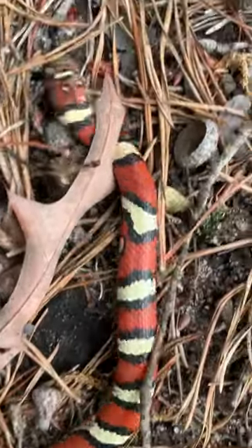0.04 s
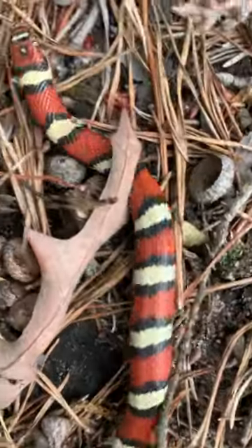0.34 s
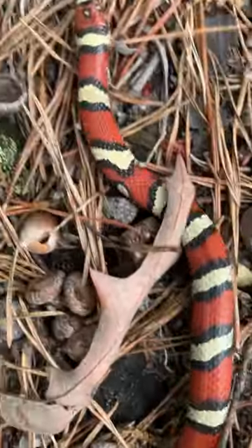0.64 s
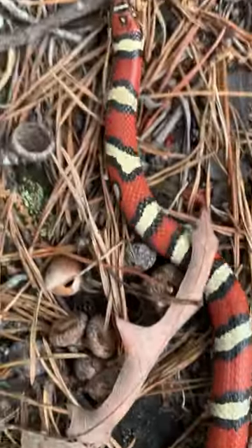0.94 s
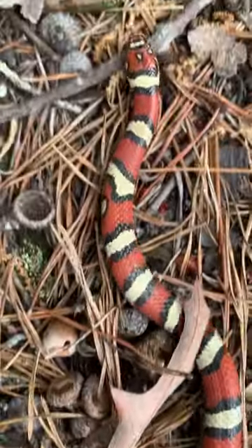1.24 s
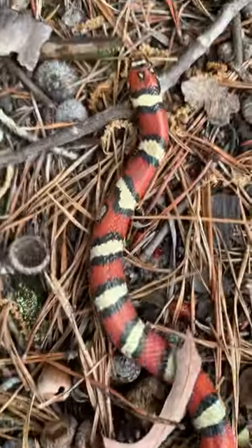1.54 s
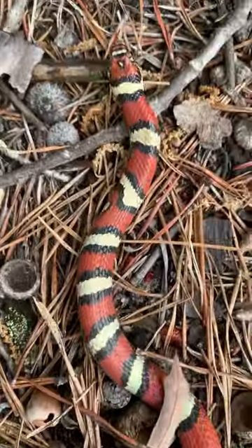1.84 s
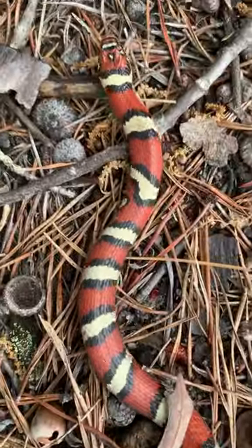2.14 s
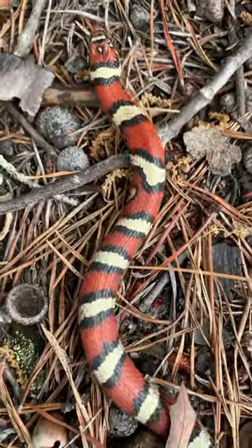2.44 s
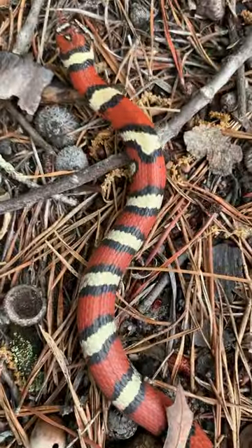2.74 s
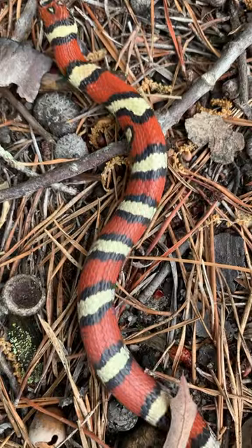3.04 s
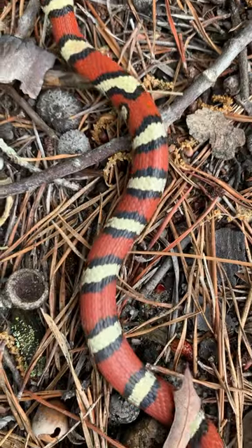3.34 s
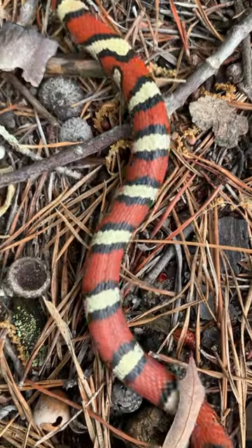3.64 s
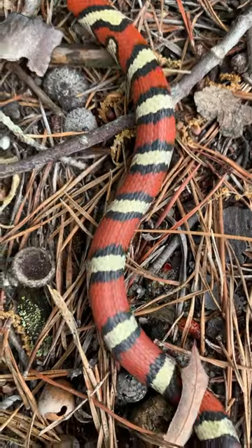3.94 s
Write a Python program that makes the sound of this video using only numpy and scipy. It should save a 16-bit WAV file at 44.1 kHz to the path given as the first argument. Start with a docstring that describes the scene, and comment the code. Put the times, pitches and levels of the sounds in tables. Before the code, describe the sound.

Low rumble of far traffic in a quiet forest, with a bird's brief whistle and trill.

```python
"""A quiet pine forest. Far traffic and engines rumble and hum throughout, under a soft rustle
and faint microphone hiss. From about 1 s, dry needles and twigs tick close by now and then.
At 1.6 s a songbird some way off gives a rising whistle, and a farther bird adds one faint note.
The first bird goes on with a short high note, a falling slide and a fast, slowing trill, all
scattered by the trees. As the trill starts, about halfway through, the rustle dies down."""
import sys
import numpy as np
from scipy import signal
from scipy.fft import rfft, irfft
from scipy.io import wavfile
from scipy.ndimage import uniform_filter1d

SR = 44100
rng = np.random.default_rng(int(sys.argv[2]) if len(sys.argv) > 2 else 0)


def digitize_waveform(pressure):
    """Quantize a signal to 16-bit integers and store it at the path in sys.argv[1].

    Rows of a 2-D input are taken as channels; values are limited to [-1, 1].
    """
    field = np.atleast_2d(pressure).T
    bounded = np.clip(field, -1, 1)
    quanta = np.round(bounded * 32767).astype(np.int16)
    wavfile.write(sys.argv[1], SR, quanta)


N = 176400
TIME = np.arange(N) / SR
FREQS = np.fft.rfftfreq(N, 1 / SR)


def amp(db):
    return 10 ** (np.asarray(db) / 20)


def unit_level(x):
    return x / np.sqrt(np.mean(x ** 2) + 1e-30)


def look_up(table, hz):
    """A table's value at hz, on a logarithmic frequency axis."""
    f, value = np.transpose(table)
    return np.interp(np.log(hz + 1), np.log(f + 1), value)


def filtered(x, spectrum):
    return irfft(rfft(x) * amp(look_up(spectrum, FREQS)), N)


def add(mix, start_s, sound):
    part = mix[round(start_s * SR):][:len(sound)]
    part += sound[:len(part)]


def drift(rate):
    """A random wobble, with up to rate swings a second."""
    speeds = np.geomspace(rate / 10, rate, 10)
    return unit_level(sum(np.sin(2 * np.pi * (hz * TIME + rng.random())) for hz in speeds))


def stereo(a, b):
    """Two unrelated sounds become a partly alike left and right, as if from all around."""
    # how alike the two sides are (frequency [Hz], likeness [0 to 1])
    likeness = [(60, .999), (125, .993), (250, .92), (450, .68), (750, .45), (1400, .6), (3000, .62),
                (5000, .85), (11000, .92)]
    same = look_up(likeness, FREQS)
    return np.array([a, irfft(same * rfft(a) + np.sqrt(1 - same ** 2) * rfft(b), N)])


def noise(spectrum, patchy_db):
    """Noise from all around, with drifting louder and softer patches."""
    _, _, cells = signal.stft(rng.standard_normal((2, N)), SR, nperseg=1024, noverlap=768)
    patches = uniform_filter1d(rng.standard_normal(cells.shape[1:]), size=10, axis=0)
    patches = unit_level(uniform_filter1d(patches, size=16, axis=1))
    white = signal.istft(cells * amp(patchy_db * patches), nperseg=1024, noverlap=768)[1][:, :N]
    return stereo(*filtered(white, spectrum)) * np.sqrt(SR / 2)


def traffic(bass_edge_hz=107):
    """Far traffic rumbles; its deep bass and the body above it swell separately."""
    # tone of the rumble (frequency [Hz], level [dB])
    spectrum = [(10, -100), (20, -92.5), (27, -92), (35, -86), (46, -65), (60, -69), (92, -69),
                (120, -70.5), (155, -70.5), (205, -76.5), (300, -79.5), (420, -84.5), (540, -91),
                (650, -91), (900, -106), (1300, -122), (2500, -145)]
    # its swells (time [s], bass gain [dB], body gain [dB])
    swells = [(0, -1.5, 2.5), (.4, 1, 1.5), (.8, -5.5, 0.5), (1.3, 0, 1.5), (1.7, -1.5, .5), (2.3, 0.5, 0),
              (2.7, -6, 0.5), (3.3, 1.5, -0.5), (4, 0.5, -2)]
    times, bass_db, body_db = np.transpose(swells)
    roar = noise(spectrum, patchy_db=.03)
    bass = irfft(rfft(roar) / (1 + (FREQS / bass_edge_hz) ** 6), N)
    body = roar - bass
    return bass * amp(np.interp(TIME, times, bass_db)) + body * amp(np.interp(TIME, times, body_db))


def engines(wander_hz=1.114, waver_db=1.5, change_s=.032):
    """Far engines hum and waver: the higher tones drop back, then the deep ones come up."""
    # engine tones (pitch [Hz], early level [dB], late level [dB], time of change [s])
    tones = [(25.8, -68, -63, 3.5), (52, -60, -54, 3.5), (80.73, -54, -52.5, 2.9), (102.5, -56, -50, 3.44),
             (133.86, -58, -62, 2.2), (171.75, -58.5, -65.5, 1.93), (243.5, -60, -68.5, 1.9),
             (485.4, -71, -73, 0.92)]
    out = np.zeros(N)
    for hz, early_db, late_db, when in tones:
        late = (1 + np.tanh((TIME - when) / change_s)) / 2
        level = amp(early_db + (late_db - early_db) * late) * unit_level(amp(waver_db * drift(2.7)))
        pitch = hz + wander_hz * drift(5)
        out += level * np.sqrt(2) * np.sin(2 * np.pi * np.cumsum(pitch) / SR)
    return out


def rustle(crackles_per_s=90, crackle_db=-12, spread_db=5.5):
    """The forest rustles: soft noise with tiny crackles in it, dying down halfway."""
    # tone of the rustle (frequency [Hz], level [dB])
    spectrum = [(300, -125), (700, -107), (1000, -107), (1250, -110), (1650, -105.5), (2000, -111.5),
                (2350, -116), (3200, -110), (4000, -115), (5500, -126), (9000, -137)]
    # its rise and fall (time [s], gain [dB])
    loudness = [(0, 0), (.5, -0.5), (1.15, 1), (1.5, 1), (1.85, 2), (2.18, 1), (2.35, -4.5), (3.05, -4),
                (3.5, -6.5), (4, -6)]
    hits = rng.random((2, N)) < crackles_per_s / SR
    sizes = amp(spread_db * np.minimum(rng.exponential(1, (2, N)), 3))
    crackle = stereo(*filtered(unit_level(hits * sizes), spectrum)) * np.sqrt(SR / 2)
    level = amp(np.interp(TIME, *np.transpose(loudness)))
    return level * (noise(spectrum, patchy_db=2.5) + amp(crackle_db) * crackle)


def microphone_hiss(start_db=-.7, end_db=-3.5):
    """The microphone's own faint hiss, slowly getting softer."""
    # tone of the hiss (frequency [Hz], level [dB])
    spectrum = [(100, -124), (3000, -122), (4500, -122), (5500, -118.5), (7000, -119), (9000, -120.5),
                (11000, -119.5), (14500, -122.5), (16000, -125)]
    return noise(spectrum, patchy_db=1.9) * amp(np.linspace(start_db, end_db, N))


def needles(ring_width=.08):
    """Dry needles and twigs tick: each is a brief burst that rings at one pitch, with a broad crack."""
    # ticks (time [s], pitch [Hz], decay [s], level [dB], crack against ring [dB])
    ticks = [(.891, 6700, .001, -70, -12), (.9614, 7600, 0.0016, -62.5, -8),
             (0.9647, 7740, 0.0019, -64.5, -13), (.9697, 10000, .001, -61.5, 3),
             (.9725, 6000, .0025, -69, 5), (1.224, 1320, .0037, -67, -16), (2.548, 6600, .002, -75, -3),
             (3.04, 1510, 0.0049, -65.5, -18), (3.305, 1440, 0.0073, -70.5, -20)]
    out = np.zeros((2, N))
    t, hz = TIME[:2048], np.fft.rfftfreq(2048, 1 / SR)
    for start, pitch, decay, db, crack_db in ticks:
        ring = np.exp(-((hz / pitch - 1) / ring_width) ** 2)
        crack = amp(crack_db) * np.exp(-(hz / pitch - 1) ** 2)
        for side in out:
            burst = unit_level(irfft(rfft(rng.standard_normal(len(t))) * (ring + crack)))
            add(side, start, amp(db) * np.exp(-t / decay) * burst)
    return stereo(*out)


def note(curve, quaver=.006):
    """A bird's pure note; its pitch trembles by the fraction quaver."""
    times, hz, db = np.transpose(curve)
    pitch = np.interp(TIME, times, hz) * (1 + quaver * drift(220))
    level = amp(np.interp(TIME, times, db)) * (TIME > times[0]) * (TIME < times[-1])
    return level * np.sqrt(2) * np.sin(2 * np.pi * np.cumsum(pitch) / SR)


def rising_whistle():
    """The songbird opens with a whistle that climbs."""
    # the whistle (time [s], pitch [Hz], level [dB])
    curve = [(1.615, 3230, -80), (1.643, 3460, -62), (1.662, 3550, -61), (1.68, 3690, -62),
             (1.695, 3780, -61.5), (1.712, 3850, -56.5), (1.734, 3940, -56), (1.744, 4030, -62),
             (1.753, 4200, -73)]
    return note(curve)


def farther_bird():
    """A second bird gives one faint, trembling note."""
    # its note (time [s], pitch [Hz], level [dB])
    curve = [(1.96, 3190, -84), (2.0, 3100, -79), (2.04, 3084, -79), (2.09, 3050, -101)]
    return note(curve, quaver=.024)


def high_note_and_slide():
    """The songbird's short high note overlaps a rougher slide down into the trill."""
    # the high note (time [s], pitch [Hz], level [dB])
    high = [(2.172, 5220, -82), (2.186, 5110, -69.5), (2.198, 4890, -66.5), (2.208, 4900, -76),
            (2.238, 4980, -73), (2.265, 4960, -84), (2.308, 5040, -73.5), (2.33, 5000, -86)]
    # the slide (time [s], pitch [Hz], level [dB])
    slide = [(2.2, 4750, -80), (2.215, 4520, -70), (2.245, 4360, -81), (2.268, 4230, -65),
             (2.285, 4150, -78)]
    return note(high) + note(slide, quaver=.029)


def glide(stroke, db, pitch_spread=.006):
    """One quick glide in pitch that swells and dies."""
    length, from_hz, to_hz = stroke
    progress = np.arange(0, 1, 1 / (length * SR))
    hz = (from_hz + (to_hz - from_hz) * progress) * (1 + pitch_spread * rng.standard_normal())
    return amp(db) * np.sin(np.pi * progress) * np.sin(2 * np.pi * np.cumsum(hz) / SR)


def trill(fall_delay_s=.01, fall_db=-8.5, fall_fade_db_per_s=32):
    """Each chirp is a sharp rise and a softer, higher fall, which fades as the trill slows."""
    # chirps (time [s], level [dB])
    chirps = [(2.2415, -61.5), (2.2937, -58), (2.3462, -59.5), (2.3987, -59), (2.4526, -59),
              (2.5066, -57.5), (2.5612, -57), (2.6155, -57.5), (2.6703, -59.5), (2.7265, -60),
              (2.7822, -66.5), (2.834, -72)]
    # the two glides of a chirp (length [s], start pitch [Hz], end pitch [Hz])
    rise = (.015, 3640, 4600)
    fall = (.02, 5250, 4300)
    out = np.zeros(N)
    for start, db in chirps:
        faded_db = fall_fade_db_per_s * (start - chirps[0][0])
        add(out, start, glide(rise, db))
        add(out, start + fall_delay_s, glide(fall, db + fall_db - faded_db))
    return out


def forest_echo(song, build_s=.014):
    """The song arrives directly, bounces off trunks and leaves a tail whose highs die first."""
    # echoes from near trunks (delay [s], gain [dB])
    trunks = [(.0135, -12.5), (.0205, -12), (.029, -12.5), (.039, -15), (.066, -15), (.139, -11)]
    # how long the forest rings (frequency [Hz], time to fade by 60 dB [s])
    ring_times = [(3850, .82), (4250, .54), (5000, .48)]
    # tone of the sound the trees scatter (frequency [Hz], gain [dB])
    scatter = [(3200, -1), (3900, -1.5), (4300, 1), (5000, -2.5)]
    near = song.copy()
    for delay, db in trunks:
        add(near, delay, amp(db) * song)
    hz, t, cells = signal.stft(rng.standard_normal((2, SR)), SR, nperseg=256)
    ring_s = look_up(ring_times, hz)[:, None]
    envelope = amp(-60 * t / ring_s) * (1 - np.exp(-t / build_s)) / np.sqrt(ring_s)
    tails = signal.istft(cells * envelope, nperseg=256)[1]
    tails /= np.linalg.norm(tails[0])
    scattered = signal.fftconvolve(filtered(song, scatter)[None], tails, axes=1)[:, :N]
    return near + stereo(*scattered)


def scene():
    song = rising_whistle() + high_note_and_slide() + trill()
    background = traffic() + engines() + rustle() + microphone_hiss()
    return background + forest_echo(song + farther_bird()) + needles()


def record(dry, fade_s=.006, top_hz=15300):
    """Two microphones shift left against right; the ends fade and the highest treble is cut."""
    # how far the left wave runs ahead of the right (frequency [Hz], phase [radians])
    lead = [(0, 0), (200, .08), (400, .33), (560, .85), (750, 1.6), (1000, 2.45), (3960, 2.1), (4800, 3.1),
            (6900, 6.3), (15100, 18.9)]
    # how much louder the left is (frequency [Hz], left over right [dB])
    balance = [(350, 0), (550, 2.5), (800, 2), (1100, -1), (1600, 0), (2500, -2.5), (4000, -.3), (6000, 0)]
    hz = np.fft.rfftfreq(N, 1 / SR)
    left = np.exp(.5j * np.interp(hz, *np.transpose(lead))) * amp(look_up(balance, hz) / 2)
    from_end_s = np.minimum(TIME, TIME[::-1])
    fade = np.sin(np.pi / 2 * np.minimum(from_end_s / fade_s, 1)) ** 2
    wide = irfft(rfft(dry * fade) * np.array([left, 1 / left]), N)
    treble_cut = signal.firwin(511, top_hz, window=("kaiser", 9), fs=SR)
    return signal.oaconvolve(wide, treble_cut[None], "same")


dry = scene()
out = record(dry)
digitize_waveform(out)
```